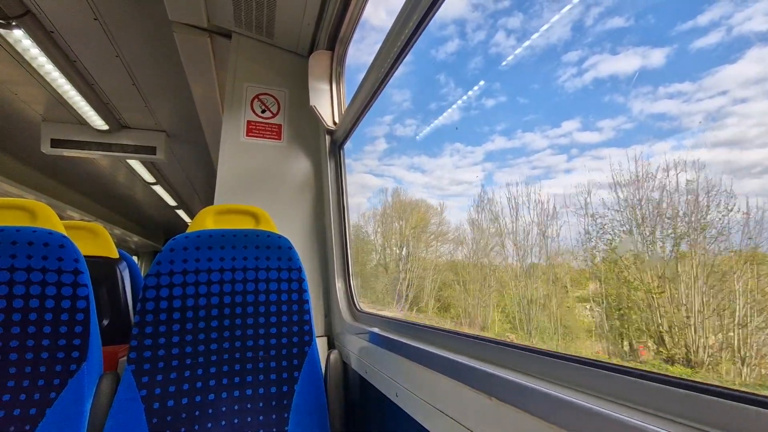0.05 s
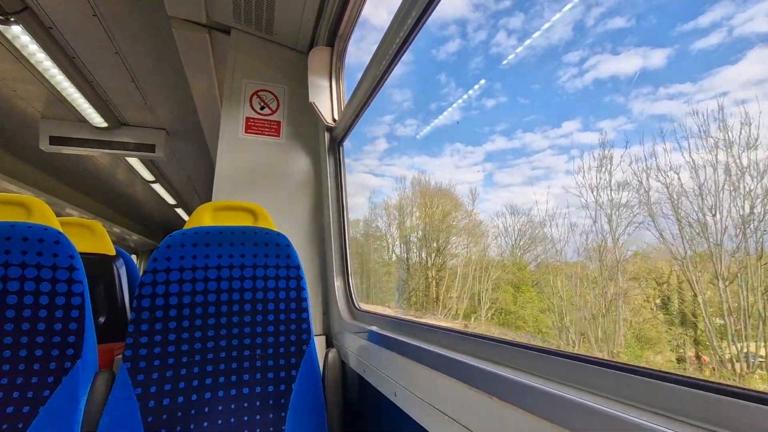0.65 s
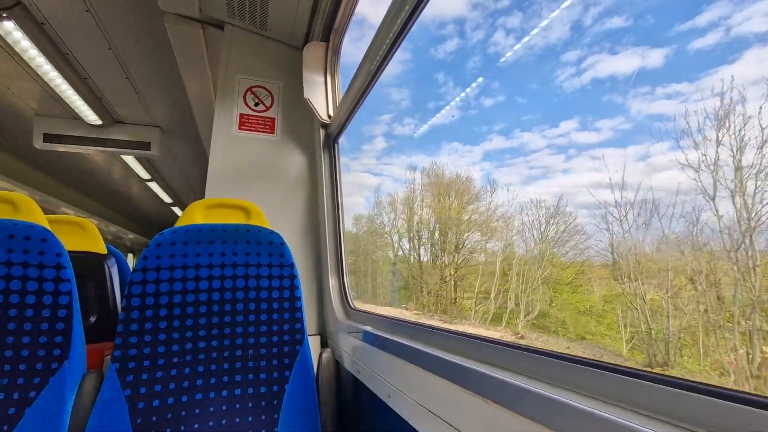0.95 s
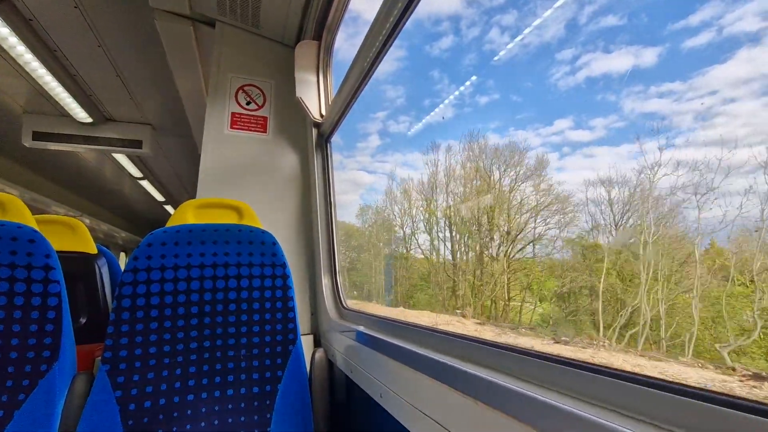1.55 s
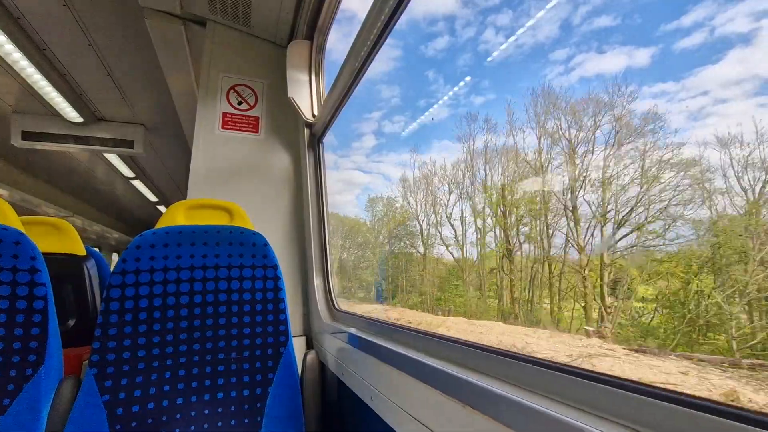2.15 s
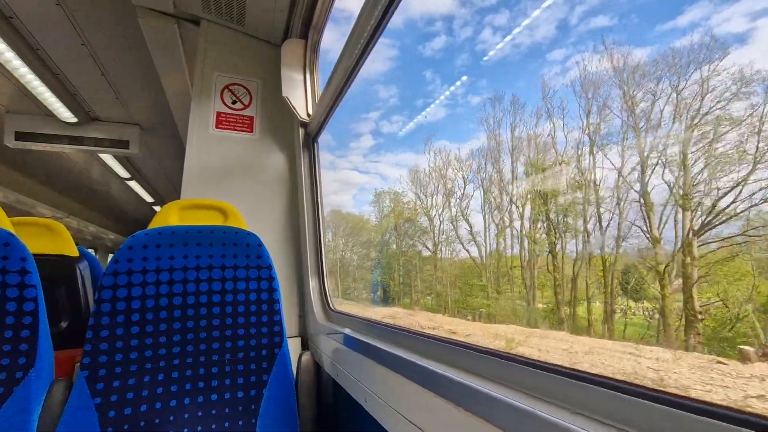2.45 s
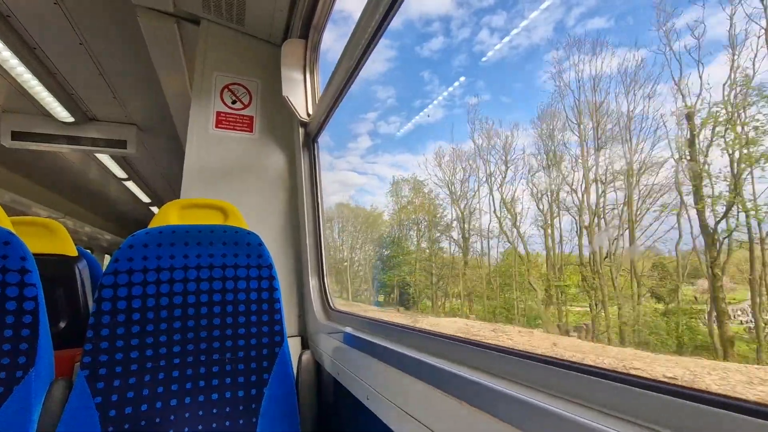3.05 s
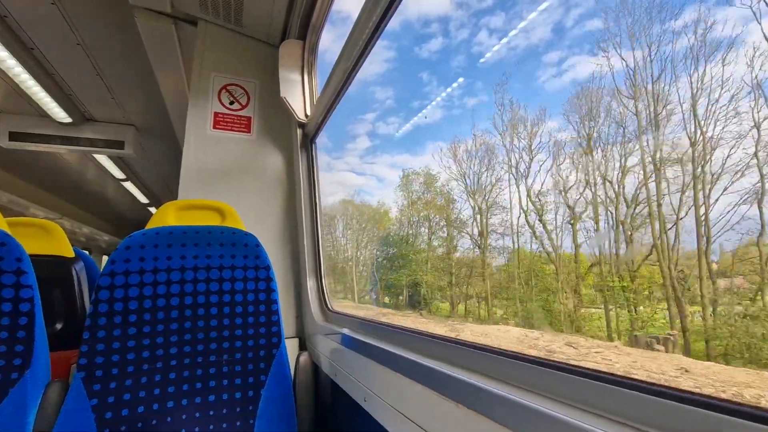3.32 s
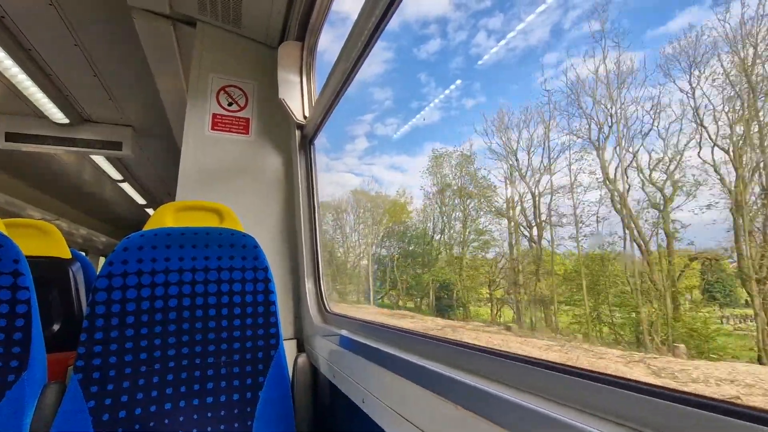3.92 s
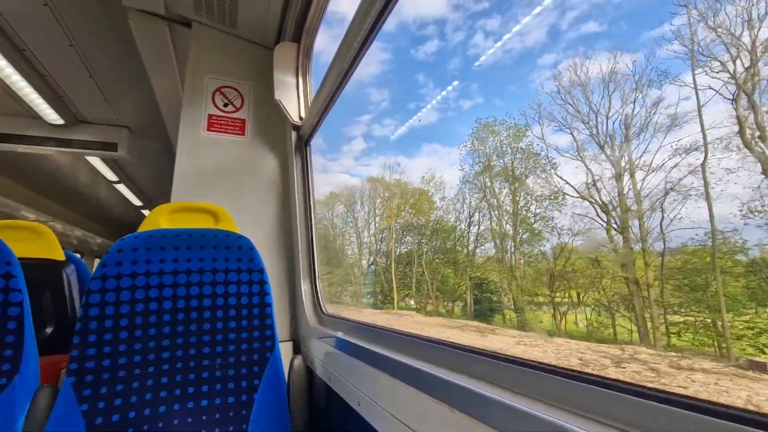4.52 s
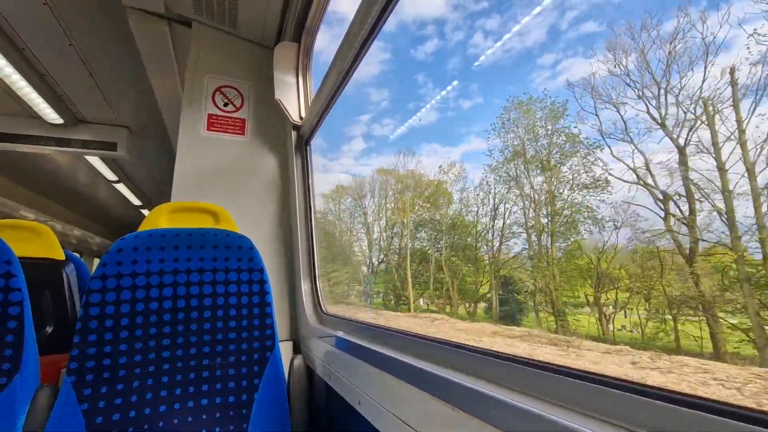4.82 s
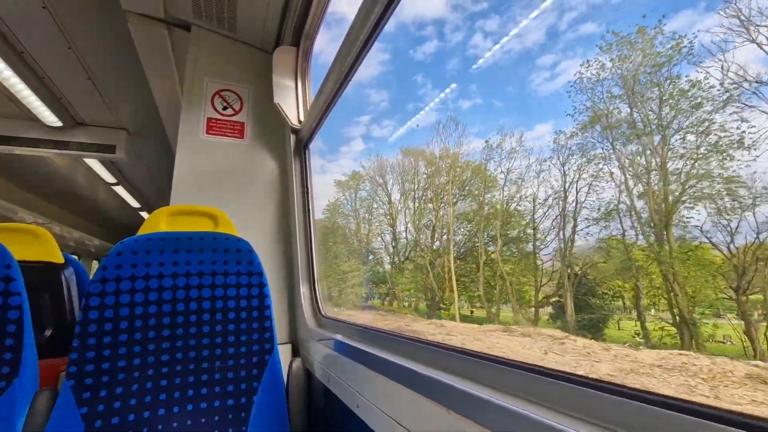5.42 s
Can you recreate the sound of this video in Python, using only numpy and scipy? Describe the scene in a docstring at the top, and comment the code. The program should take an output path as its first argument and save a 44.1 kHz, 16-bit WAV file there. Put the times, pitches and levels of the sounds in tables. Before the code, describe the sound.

Inside a cruising passenger train, a deep underfloor diesel hum runs with rolling track roar and a faint ring from the wheels.

```python
"""Diesel railcar, cruising

The six-cylinder engine under the floor booms and throbs through the carriage at a steady speed.
Beneath it the wheels rumble through the floor, roar through the walls and ring faintly on the rails.
On top sit thin machinery whines, ventilation hiss and a few tiny, close ticks and rustles."""
import sys
import numpy as np
from scipy import signal
from scipy.fft import rfft, irfft
from scipy.io import wavfile

SR = 44100
rng = np.random.default_rng(int(sys.argv[2]) if len(sys.argv) > 2 else 0)


def generate_wav(signal):
    """Clip the signal to [-1, 1] and save it as 16-bit WAV at the path in sys.argv[1]."""
    frames = np.transpose(np.atleast_2d(signal))
    scaled = np.clip(frames, -1, 1) * 32767
    pcm = np.round(scaled).astype(np.int16)
    wavfile.write(sys.argv[1], SR, pcm)


N = 250047


def gain_of(db):
    """Decibels to amplitude."""
    return 10 ** (np.asarray(db) / 20)


def unit_rms(x):
    """Scales to rms 1."""
    return x / np.sqrt(np.mean(x ** 2) + 1e-20)


def bins():
    """The frequencies of a full-length spectrum."""
    return np.arange(N // 2 + 1) * SR / N


def eq_curve(points):
    """Joins (f/Hz, value) points over log frequency, at every bin."""
    hz, value = np.transpose(points)
    return np.interp(np.log(bins() + 1), np.log(hz), value)


def pan(balance_db):
    """Left and right gains for a left-minus-right level."""
    return gain_of(np.array([[.5], [-.5]]) * balance_db)


def noise(density_db):
    """Noise with the given level per Hz."""
    return irfft(rfft(rng.standard_normal(N)) * gain_of(density_db), N) * np.sqrt(SR / 2)


def band(hz, width):
    """Noise ringing in one resonance, rms 1."""
    return unit_rms(noise(-20 * np.log10(1 + ((bins() - hz) / width) ** 2)))


def drift(rate_hz):
    """A slow random wander, rms 1."""
    count = 1200
    hz = np.arange(count // 2 + 1) * SR / N
    spectrum = rfft(rng.standard_normal(count)) / (1 + (hz / rate_hz) ** 2) * (hz > 0)
    return np.interp(np.linspace(0, count - 1, N), np.arange(count), unit_rms(irfft(spectrum)))


def swell(centre_s, sigma_s, db):
    """A bell-shaped fade in and out."""
    return gain_of(db) * np.exp(-.5 * ((np.arange(N) / SR - centre_s) / sigma_s) ** 2)


# Stereo tilt of hiss and roar: f/Hz, left minus right/dB
BED_BALANCE = [(300, -14), (450, -0.5), (700, 2), (1100, 5.5), (1900, 2), (2900, 4.5), (4200, 4), (4850, 0),
               (7200, 6), (9500, 1), (12000, 3.5), (13200, 1.5), (15000, 4.5)]
# Their stereo width: f/Hz, correlation between the ears
BED_CORRELATION = [(150, .98), (350, .65), (600, .2), (1000, -.05), (2000, .05), (8000, .1), (14000, .1)]

def diffuse_bed(density_db):
    """Noise from all round the carriage: alike at both ears only in the bass."""
    angle = np.arccos(np.clip(eq_curve(BED_CORRELATION), -1, 1)) / 2
    mid, side = rfft(rng.standard_normal((2, N))) * [np.cos(angle), np.sin(angle)]
    pair = np.array([mid + side, mid - side]) * pan(eq_curve(BED_BALANCE))
    return irfft(pair * gain_of(density_db), N) * np.sqrt(SR / 2)


# Airy top end: f/Hz, level/dB per Hz
AIR_SPECTRUM = [(4000, -110), (8300, -102.5), (9800, -106.5), (11100, -106), (11700, -102.5), (13700, -104),
                (14600, -101), (15300, -107.5)]

def air_hiss(wander_db=.8):
    """Ventilation air, a wide and gently wavering hiss."""
    return diffuse_bed(eq_curve(AIR_SPECTRUM)) * gain_of(wander_db * drift(rate_hz=7))


# Soft close detail: centre t/s, sigma/s, level/dB, f/Hz, width/Hz
RUSTLE_CUES = [(.63, .04, -58.5, 12800, 1100), (.85, 0.078, -64, 14000, 2500), (1.46, .08, -71, 12700, 700),
               (2.29, .04, -47, 1100, 20), (3.54, .05, -50, 2030, 30), (3.78, .025, -63, 9500, 2200),
               (4.0, .065, -46.5, 1440, 70), (5.05, 0.13, -50.5, 2030, 40)]

def rustles():
    """Brief swells of noise: broad bands rustle, narrow ones sound like rubbing."""
    return sum(swell(centre_s, sigma_s, db) * np.array([band(hz, width), band(hz, width)])
               for centre_s, sigma_s, db, hz, width in RUSTLE_CUES)


# Whine pitches, low to high: f/Hz
WHINE_PITCHES = [2062, 2320, 2745, 3295, 3871, 4364, 6770, 9028, 9588]
# Mix of each whine: width/Hz, left level/dB, right level/dB
WHINE_MIX = [(18, -61.5, -68.5), (9.5, -64.5, -64), (6, -65, -75.5), (8, -71, -76), (8, -67.5, -83),
             (16, -67, -79.5), (10, -81, -84.5), (10, -82.5, -93.5), (10, -86, -92)]

def machinery_whines():
    """Thin wavering tones of the drive line and fans."""
    return sum(gain_of([[left_db], [right_db]]) * band(hz, width)
               for hz, (width, left_db, right_db) in zip(WHINE_PITCHES, WHINE_MIX))


# Tiny ticks: t/s, level before trim/dB, f/Hz, width/Hz, left minus right/dB
TICK_CUES = [(3.414, -40.5, 13300, 4500, -3.5), (3.8232, -38, 11800, 3230, 4), (4.879, -42, 8460, 2500, 9),
             (4.8934, -34, 10400, 3200, 10), (5.452, -34, 12100, 3500, -6), (5.474, -41, 11900, 3000, 1),
             (5.488, -41, 12800, 3000, -3)]

def fitting_ticks(trim_db=-2.5, attack_s=.001, snap_t60_s=.011, tail_t60_s=.13, tail_db=-21):
    """Fittings tick: each a short bright snap with a little carriage reverb after it."""
    out = np.zeros((2, N))
    t = np.arange(SR // 5) / SR
    hz = np.fft.rfftfreq(len(t), 1 / SR)
    snap = np.minimum(t / attack_s, 1) * 1000 ** (-t / snap_t60_s)
    tail = gain_of(tail_db) * 1000 ** (-t / tail_t60_s)
    for start_s, db, pitch, width, balance_db in TICK_CUES:
        grain = rng.standard_normal(len(t)) + rng.standard_normal((2, len(t)))  # half mono, half wide
        ring = unit_rms(irfft(rfft(grain) / (1 + ((hz - pitch) / width) ** 2) ** 2, len(t)))
        tick = gain_of(db + trim_db) * pan(balance_db) * (snap + tail) * ring
        slot = out[:, round(start_s * SR):][:, :len(t)]
        slot += tick[:, :slot.shape[1]]
    return out


# Flares of the ring on rough rail: centre t/s, sigma/s, left level/dB
RAIL_FLARES = [(0.175, .025, -32.5), (0.801, .4, -49), (1.502, .1, -40), (1.84, 0.014, -35.5),
               (3.047, .06, -45), (4.83, 0.026, -37), (5.353, 0.17, -49)]

def wheel_ring(mode_hz=954, waver_hz=10, left_db=-52, flicker_db=3.5, right_drop_db=10):
    """Rail roughness keeps one wheel mode singing; its pitch and level flicker."""
    pitch = mode_hz + waver_hz * np.array([drift(rate_hz=30), drift(rate_hz=30)])
    ring = np.sqrt(2) * np.sin(2 * np.pi * np.cumsum(pitch, axis=1) / SR)
    flicker = gain_of(left_db + flicker_db * drift(rate_hz=13))
    flares = sum(swell(*row) for row in RAIL_FLARES)
    return ring * (flicker + flares) * gain_of([[0], [-right_drop_db]])


# Roar through the walls, before the panel peaks: f/Hz, level/dB per Hz
ROAR_SPECTRUM = [(60, -100), (290, -63), (470, -69.5), (720, -66), (980, -73.5), (1100, -78.5),
                 (1750, -80.5), (2250, -81), (2600, -80.5), (3500, -87), (4800, -87.5), (6000, -94),
                 (7900, -97), (8400, -116)]
# Wall panel resonances: f/Hz, width/Hz, boost/dB
PANEL_PEAKS = [(555, 15, 5.5), (725, 54, 4.5), (964, 89, 8.5), (1365, 270, 6), (1994, 250, 6),
               (2170, 91, 3.5), (3710, 120, 4), (4340, 120, 0.5)]

def rolling_roar(cycles, wander_db=.5, pulse_depth=.052):
    """Rolling noise coloured by the wall panels, pulsing slightly with each firing and crankshaft turn."""
    boost_db = sum(db / (1 + (2 * (bins() - hz) / width) ** 2) for hz, width, db in PANEL_PEAKS)
    bed = diffuse_bed(eq_curve(ROAR_SPECTRUM) + boost_db)
    firing = np.cos(2 * np.pi * len(CYLINDER_ACCENTS) * cycles)
    crank = np.cos(2 * np.pi * 2 * cycles)
    return bed * gain_of(wander_db * drift(rate_hz=3.5)) * (1 + pulse_depth * (firing + crank) / 2)


# Low-end bed: f/Hz, level/dB per Hz
RUMBLE_SPECTRUM = [(12, -80), (18, -49), (25, -57), (35, -46), (46, -49.5), (68, -45), (105, -53),
                   (133, -46), (152, -49.5), (170, -43), (212, -55), (330, -58), (430, -72), (2000, -135)]
# Sub-bass swells on uneven track: centre t/s, sigma/s, level/dB
TRACK_SWELLS = [(1.654, .22, -28), (3.247, .22, -25.5), (3.9, .2, -33.5)]

def floor_rumble(flex_hz=32.4, flex_db=-41, wander_db=3.5, hum_hz=69, hum_db=-33.5):
    """Wheels shake the floor and ring a deep bending mode of the body; the drive line adds a hum."""
    pitch = flex_hz + .8 * drift(rate_hz=3)
    shaking = gain_of(flex_db + wander_db * drift(rate_hz=3)) + sum(swell(*row) for row in TRACK_SWELLS)
    flex = np.sqrt(2) * np.sin(2 * np.pi * np.cumsum(pitch) / SR) * shaking
    hum = gain_of(hum_db) * band(hum_hz, width=1.5)
    floor_db = eq_curve(RUMBLE_SPECTRUM)
    # long waves reach both ears nearly alike, so the side signal stays low
    side = noise(floor_db + eq_curve([(30, -19), (120, -20), (200, -18), (350, -13)]))
    mid = flex + hum + noise(floor_db)
    return mid * pan(balance_db=.7) + np.array([side, -side])


# Engine speed: t/s, four-stroke cycle rate/Hz
ENGINE_SPEED = [(0.0, 15.65), (1.0, 15.671), (2.0, 15.67), (3.0, 15.678), (4.0, 15.68), (5.0, 15.688),
                (5.67, 15.667)]

def engine_cycles(first_firing_s=.0574):
    """Four-stroke cycles since the first cylinder fired, each two turns of the crankshaft."""
    rate_hz = np.interp(np.arange(N) / SR, *np.transpose(ENGINE_SPEED))
    return np.cumsum(rate_hz) / SR - first_firing_s * ENGINE_SPEED[0][1]


# Cylinder strengths in firing order: level/dB
CYLINDER_ACCENTS = [-2.7, -3.5, -.1, -3.8, -2.6, -3.2]
# Boom resonances struck by the firings: f/Hz, width/Hz
BOOM_MODES = [(158, 22), (199, 16)]
# Slap along the carriage: delay/s, gain
CARRIAGE_ECHO = (.0234, .85)
# Drone harmonics at the seat: multiple of the cycle rate, left level/dB, right level/dB
ENGINE_HARMONICS = [(2, -40.5, -41.0), (4, -27.5, -28.0), (5, -35.0, -35.5), (6, -38.0, -37.0),
                    (7, -33.0, -33.5), (8, -26.5, -27.0), (9, -26.0, -27.0), (10, -32.5, -34.5),
                    (11, -16.0, -16.5), (12, -28.0, -29.0), (13, -33.0, -36.0), (14, -34.5, -34.5),
                    (15, -28.7, -29.2), (16, -54.0, -51.0), (17, -60.0, -51.0), (18, -39.0, -35.0),
                    (19, -49.0, -49.5), (20, -49.0, -49.5), (21, -52.0, -48.0), (22, -47.5, -47.5),
                    (23, -48.5, -44.0), (24, -48.5, -45.5), (25, -49.5, -43.0), (26, -56.5, -53.0),
                    (28, -59.5, -51.0), (31, -70.5, -54.5), (33, -55.5, -62.0), (34, -48.0, -58.0),
                    (37, -58.5, -53.0), (40, -55.5, -54.5), (43, -55.5, -61.0), (44, -57.0, -53.0),
                    (45, -46.5, -58.5), (60, -51.5, -68.0), (61, -51.5, -62.5)]

def engine_drone(cycles, waver_db=.34, upper_waver_db=1.65, jitter_cycles=.00055):
    """A throbbing harmonic stack: six unequal firings, the boom modes and an echo set its phases."""
    cycles = cycles + jitter_cycles * drift(rate_hz=1.3)
    firing_slots = np.arange(len(CYLINDER_ACCENTS)) / len(CYLINDER_ACCENTS)
    echo_s, echo_gain = CARRIAGE_ECHO
    out = np.zeros((2, N))
    for order, left_db, right_db in ENGINE_HARMONICS:
        hz = order * ENGINE_SPEED[0][1]
        firings = np.sum(gain_of(CYLINDER_ACCENTS) * np.exp(-2j * np.pi * order * firing_slots))
        boom = np.prod([1 / (1 + 1j * (hz ** 2 - f ** 2) / (hz * width)) for f, width in BOOM_MODES])
        echo = 1 + echo_gain * np.exp(-2j * np.pi * hz * echo_s)
        # short waves arrive by many shifting paths, and the shortest differ between the ears
        scatter = np.interp(hz, [240, 360], [0, 1])
        spread = np.interp(hz, [250, 650], [0, 1])
        path_phase = 2 * scatter * rng.standard_normal() + spread * rng.standard_normal((2, 1))
        phase = 2 * np.pi * order * cycles + np.angle(firings * boom * echo) + path_phase
        waver = gain_of((waver_db + upper_waver_db * scatter) * drift(rate_hz=1.5))
        out += np.sqrt(2) * gain_of([[left_db], [right_db]]) * waver * np.cos(phase)
    return out


def scene():
    """The stereo mix at a window seat."""
    cycles = engine_cycles()
    ride = engine_drone(cycles) + floor_rumble() + rolling_roar(cycles) + wheel_ring()
    return ride + machinery_whines() + air_hiss() + rustles() + fitting_ticks()


def record(dry):
    """A steep high cut on the whole mix."""
    high_cut = signal.firwin(1023, cutoff=15780, window=("kaiser", 9), fs=SR)
    return signal.oaconvolve(dry, high_cut[None], "same")


dry = scene()
out = record(dry)
generate_wav(out)
```